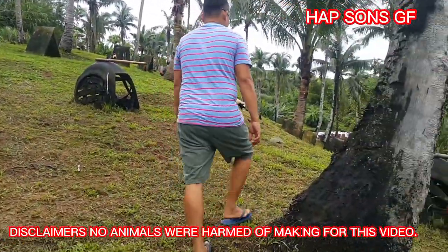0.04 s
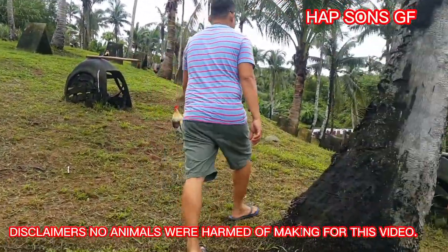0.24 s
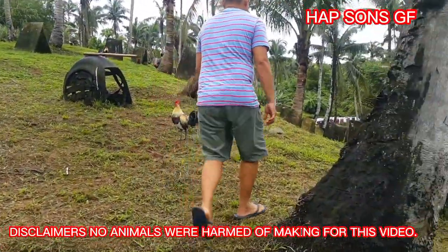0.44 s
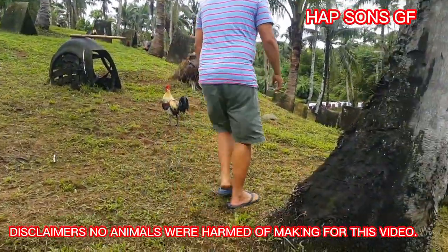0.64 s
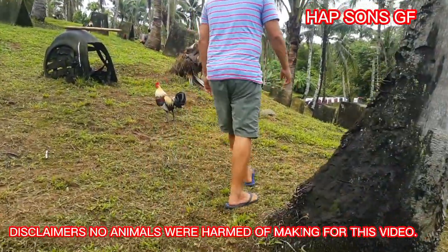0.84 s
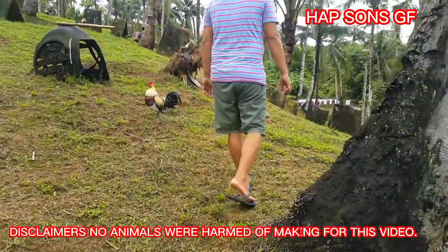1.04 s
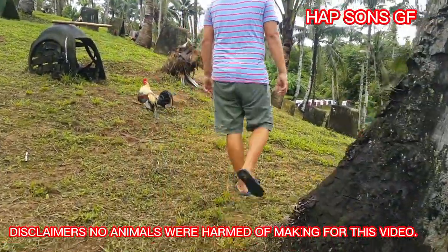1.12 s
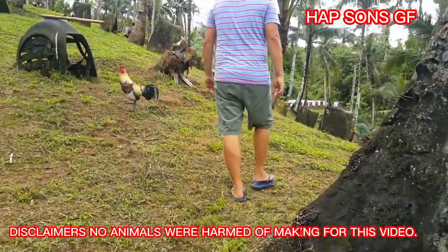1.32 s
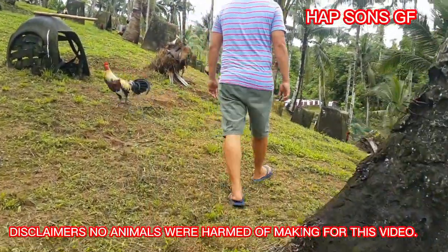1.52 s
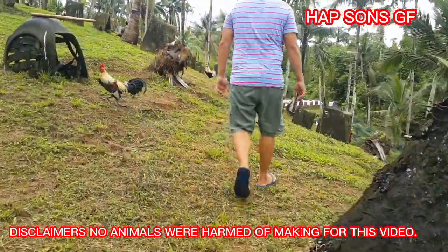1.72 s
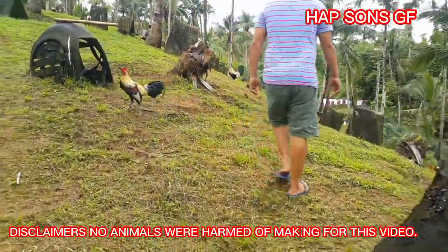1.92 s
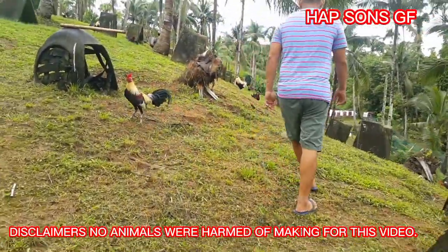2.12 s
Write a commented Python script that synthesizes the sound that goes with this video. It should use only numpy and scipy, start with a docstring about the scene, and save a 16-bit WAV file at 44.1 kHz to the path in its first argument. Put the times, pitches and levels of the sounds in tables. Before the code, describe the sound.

A faint distant rooster call and a brief thin insect tone open over soft outdoor air. From 0.2 to 1.7 seconds a near rooster crows loudly on the left, breaking between clear high notes and rough rasp, its last note long, with short diffuse reflections. A low bird note enters around 1.4 and continues; crunchy grass steps fall near 1.7 and 2.0-2.1, with faint far calls from 1.9.

```python
"""Rooster on a grassy slope

A rooster crows close by on the left: harmonic partials, broken by a rasp of flutter-modulated pulses.
Far calls and a low bird note are short partial series; steps in the grass are bursts of random cracks.
An insect sings briefly at the start as narrow-band noise, over air of coloured wide-band noise.
Two spaced microphones hear the birds and steps with time differences; the near crow also scatters.
"""
import sys
import numpy as np
from scipy import signal
from scipy.fft import rfft, irfft, next_fast_len
from scipy.io import wavfile
from scipy.ndimage import map_coordinates

SR = 44100
rng = np.random.default_rng(int(sys.argv[2]) if len(sys.argv) > 2 else 0)


def int16_out(signal):
    """Quantize to a 16-bit WAV file."""
    q = np.round(np.clip(np.atleast_2d(signal).T, -1, 1) * 32767)
    wavfile.write(sys.argv[1], SR, q.astype(np.int16))


N = 94815
CUTOFF_HZ = 15450  # upper limit of the crow's clear partials and of the microphones


def amp(db):
    """Level law: 20 dB is a factor of ten in amplitude."""
    return 10 ** (np.asarray(db) / 20)


def rms_one(x):
    """Normalization to unit root-mean-square amplitude."""
    return x / np.sqrt(np.mean(x ** 2) + 1e-20)


def in_time(rows):
    """Linear interpolation over time: a gate open from first to last row, then the columns."""
    s, *columns = np.transpose(rows)
    t = np.arange(N) / SR
    gate = np.clip(np.minimum(t - s[0], s[-1] - t) * 200, 0, 1)  # 5 ms ramps
    return [gate] + [np.interp(t, s, c) for c in columns]


def at_hz(points, hz):
    """Spectral interpolation, linear in the logarithm of frequency."""
    point_hz, values = np.array(points).T
    return np.interp(np.log(np.maximum(hz, 1)), np.log(point_hz), values)


def coloured(x, points):
    """Linear filtering: the spectrum is multiplied by a gain table of (frequency [Hz], gain [dB])."""
    size = next_fast_len(N + 4096)
    hz = np.arange(size // 2 + 1) * SR / size
    return irfft(rfft(x, size) * amp(at_hz(points, hz)), size)[..., :N]


def slow(hz):
    """Random modulation: low-passed noise of unit rms."""
    low_pass = signal.butter(2, hz, fs=SR, output="sos")
    noise = rng.standard_normal(N + 4000)
    return rms_one(signal.sosfilt(low_pass, noise)[4000:])  # without the filter's onset


def placed(x, lag_ms):
    """Interaural-type time difference: left and right copies; a positive lag delays the right one."""
    n = np.arange(N)
    return np.array([map_coordinates(x, [n + side * lag_ms * SR / 2000], order=3) for side in (1, -1)])


def air():
    """Partial coherence: stereo noise alike in the bass and extreme treble, unrelated near 940 Hz."""
    # spectrum of the air: (frequency [Hz], relative density [dB per Hz])
    air_spectrum = [(60, -3.5), (128, -4.5), (300, -15), (800, -1.5), (2000, -8), (6000, -25),
                    (15200, -38.5)]
    # left-right coherence: (frequency [Hz], likeness [-1 to 1])
    likeness = [(60, 1), (940, 0), (14800, 1)]
    level_db = -49.5
    hz = np.arange(N // 2 + 1) * SR / N
    alike = np.clip(at_hz(likeness, hz), -1, 1)
    mid, side = rfft(rng.standard_normal((2, N))) * amp(at_hz(air_spectrum, hz))
    spectra = mid * np.sqrt(1 + alike) + side * np.sqrt(1 - alike) * [[1], [-1]]
    return amp(level_db) * rms_one(irfft(spectra, N))


def insect():
    """Resonance: noise through a narrow band, independent in the two channels."""
    centre_hz, width_hz, level_db, end_s = 5370, 91, -64, 0.2
    edges_hz = [centre_hz - width_hz / 2, centre_hz + width_hz / 2]
    band = signal.butter(2, edges_hz, "band", fs=SR, output="sos")
    song = rms_one(signal.sosfilt(band, rng.standard_normal((2, N))))
    return amp(level_db) * (np.arange(N) < end_s * SR) * song


def steps():
    """Granular impact noise: each step is a burst of small random cracks in the grass."""
    # steps: (start [s], length [s], level [dB])
    step_times = [(1.659, 0.071, -29.5), (1.87, 0.012, -39.5), (2.011, 0.0566, -32), (2.122, 0.041, -29)]
    # colour of the grass: (frequency [Hz], relative density [dB per Hz])
    grass = [(300, -31), (550, -13.5), (1400, -13), (2400, -18.5), (3000, -34.5), (4500, -30), (5800, -62)]
    cracks_per_s, rustle, attack_s, release_s = 7000, 0.18, 0.0093, 0.0042
    t = np.arange(N) / SR
    cracks = (rng.random(N) < cracks_per_s / SR) * rng.standard_normal(N)
    cracks = cracks + rustle * rng.standard_normal(N)
    shape = np.zeros(N)
    for start, length, db in step_times:
        rise = np.clip((t - start) / attack_s, 0, 1)
        fall = np.clip((start + length - t) / release_s, 0, 1)
        shape += amp(db) * rise * fall
    return shape * rms_one(coloured(cracks, grass))


def far_call(rows, partials_db, rough):
    """Harmonic series: a few partials with random phase and amplitude modulation."""
    gate, hz, db = in_time(rows)
    phase = 2 * np.pi * np.cumsum(hz) / SR + rough * slow(38)
    call = np.zeros(N)
    for k, partial_db in enumerate(partials_db, 1):
        call += amp(partial_db) * (1 + rough * slow(58)) * np.sin(k * phase)
    return gate * amp(db) * call * np.sqrt(2)


def far_birds():
    """Localization by arrival time: far roosters and a low bird note, each with its own lag."""
    # calls: (time [s], pitch [Hz], level [dB])
    first_call = [(0, 791, -49), (.23, 712, -52)]
    rise_call = [(.11, 231.6, -53), (.18, 557, -42)]
    yelp_call = [(1.75, 763, -73), (1.87, 970, -47), (1.915, 1060, -49), (1.98, 840, -52.5)]
    last_call = [(2.03, 865, -52), (2.09, 950, -39), (2.15, 919, -42)]
    low_note = [(1.43, 516, -34.5), (1.6, 507.5, -33), (1.68, 451, -41), (1.75, 427, -40),
                (1.915, 435.7, -38), (1.93, 442, -42), (1.95, 472, -33.5), (2.056, 426.3, -39),
                (2.12, 407, -38)]
    # partials from the first up: relative level [dB]
    far_partials = [1.5, 2]
    low_partials = [-4.5]
    rough = 0.43
    far = placed(far_call(first_call, far_partials, rough), 0.25)
    yelp = far_call(yelp_call, far_partials, 2 * rough)
    far += placed(yelp + far_call(rise_call, low_partials, rough), 0.15)
    far += placed(far_call(last_call, far_partials, rough), -0.21)
    return far + placed(far_call(low_note, low_partials, 0.37), -0.24)


def upper_voice(phase, hz, second_db, upper_db, rasping):
    """Source and filter: harmonics from the second up, the higher ones coloured by the throat."""
    # throat, partials 3 up: (frequency [Hz], gain [dB])
    throat_gain = [(2800, -1), (3400, 4.5), (4500, -6.5), (5990, 7), (8000, -17.5), (15000, -25)]
    low_register_hz, low_tilt_db = 764, -16  # steeper fall per octave below this pitch
    waver = 0.71  # each upper partial swells and fades on its own
    voice = amp(second_db) * np.sin(2 * phase - .3)
    tilt_db = low_tilt_db * np.clip((low_register_hz - hz) / 40, 0, 1)
    for k in range(3, 22):
        # the tilt pivots at the 8th partial
        level = amp(upper_db + at_hz(throat_gain, k * hz) + tilt_db * np.log2(k / 8))
        # the rasp takes over most of the upper partials
        level = level * (k * hz < CUTOFF_HZ) * (1 - .8 * rasping) * (1 + waver * slow(12.0))
        voice += level * np.sin(k * phase + k * k)
    return voice


def rasp(phase, hz, stretches, shapes):
    """Subharmonic modulation: voice pulses shaken at an uneven share of the pitch, steadiest near half."""
    # colour of the rasp: (frequency [Hz], relative density [dB per Hz])
    throat = [(350, -65), (520, -23), (690, -9.5), (820, -14.5), (1050, -7), (1300, -14), (1600, -5),
              (1900, -12), (2140, -13.5), (2440, -8), (2750, -30), (3500, -13.5), (3750, -44), (5000, -30),
              (5800, -40.5), (7300, -43), (9500, -50), (15300, -49.5)]
    jitter_rad, breath, rate_swing, unevenness = .06, .55, .85, .35
    bright_hz, bright_octaves = 6900, .3  # the open beak lifts this band, and the top by half as much
    shaky = phase + jitter_rad * slow(330)
    pulses = sum(np.cos(k * shaky + 0.326 * k * k) for k in range(22))
    pulses = pulses + breath * rng.standard_normal(N)
    swing = rate_swing * slow(119.6)
    uneven = 1 + unevenness * slow(90)
    out = np.zeros(N)
    for (_, _, db, bright_db, tuning, share), shape in zip(stretches, shapes):
        # the rate swings less as the share nears one half, where it locks
        flutter_hz = share * hz * (1 + swing * (.53 - share))
        flutter = uneven * np.cos(2 * np.pi * np.cumsum(flutter_hz) / SR)
        colour = []
        for f, d in throat:
            band = np.exp(-(np.log2(f / bright_hz) / bright_octaves) ** 2)
            top = .5 * (f > 2 * bright_hz - 4000)
            colour.append((f * tuning, d + bright_db * (band + top)))
        burst = rms_one(coloured(shape * flutter * pulses, colour))
        out += amp(db) * burst * np.sqrt(np.mean(shape ** 2))
    return out


def near_crow():
    """Two-register phonation: clear partials and rasp, with echo interference in the left signal."""
    # clear voice: (time [s], pitch [Hz], 1st partial [dB], 2nd partial [dB], upper partials [dB])
    crow_line = [(.214, 700, -24, -32, -60), (.225, 695.6, -11, -23, -65), (.244, 721.3, -10, -23.5, -51),
                 (.25, 895, -24, -18, -45), (.29, 958, -17, -13.5, -38), (.33, 960, -17, -13.5, -38),
                 (.378, 875, -25, -20, -60), (.384, 696.4, -23, -26, -60), (.41, 607.6, -36, -29, -70),
                 (.445, 545, -48, -34, -75), (.485, 570, -40.5, -29, -69), (.502, 718, -25, -35, -42),
                 (.508, 927, -21, -9, -36), (.54, 998, -13.5, -12, -35), (.575, 971.7, -14, -11, -40),
                 (.595, 835, -29, -26, -50), (.6, 560, -45, -28, -70), (.64, 590, -30, -27, -60),
                 (.668, 704.8, -15, -17.5, -62), (.682, 872.8, -24, -13.5, -32),
                 (.77, 973, -16, -13.5, -22), (.835, 920, -17.5, -14, -40), (.9, 940, -15, -11, -42),
                 (.99, 916, -14, -8, -46), (1.07, 875, -19, -16, -40), (1.1, 687, -28, -26, -81),
                 (1.14, 622.8, -26.5, -26, -60), (1.17, 650.3, -21, -20, -50), (1.208, 700, -16, -13, -50),
                 (1.216, 871, -14.5, -24.5, -50), (1.245, 890.4, -18.5, -10, -50.5),
                 (1.29, 934.3, -19, -15.5, -40), (1.5, 883.7, -18, -18, -36), (1.57, 843, -24, -10, -42),
                 (1.65, 820, -15, -13, -46), (1.695, 780, -11, -23, -42), (1.712, 735, -6, -40, -65),
                 (1.73, 630, -30, -40.5, -72)]
    # rasps: (start [s], end [s], level [dB], bright band [dB], throat tuning [ratio], flutter [share of pitch])
    stretches = [(0.221, 0.291, -14.5, 11, 1.075, 0.28), (0.309, 0.347, -19.5, 24, 1.08, 0.4),
                 (0.332, 0.398, -14.5, 6, 1.01, 0.27), (0.379, 0.495, -34.5, 5, 0.99, .2),
                 (0.49, 0.516, -15.5, -7.5, 1.035, 0.25), (0.576, 0.598, -12.5, -18, 1.09, 0.15),
                 (0.642, 0.845, -18, -2, 1.044, 0.36), (0.859, 0.88, -13.5, 0, 1.1, 0.34),
                 (1.041, 1.145, -15.5, -3.5, 1.087, 0.27), (1.201, 1.229, -20, 9, 0.93, 0.27),
                 (1.267, 1.345, -17.5, 15.5, 0.94, .33), (1.354, 1.515, -20.5, 20, 0.945, 0.28),
                 (1.509, 1.548, -21.5, 17, 0.96, .5), (1.706, 1.73, -24.5, 3, 0.96, 0.37)]
    # an echo lifts, then cancels, the left 1st partial: (time [s], gain [dB], phase [rad])
    left_echo = [(.24, -3, 0.5), (.29, 2.5, 0.5), (.58, 4.5, 0), (.66, 1, 0), (1.5, -1.5, -0.5),
                 (1.55, 3.5, 3), (1.655, -12.5, 1.5), (1.665, -21, -1.2), (1.74, 9.5, 0.33)]
    attack_s, release_s, locked_release_s = 0.016, 0.023, 0.12  # a flutter locked at one half dies slowly
    tone_waver = 0.26  # phase [rad] and share of amplitude, while the voice rasps
    gate, hz, first_db, second_db, upper_db = in_time(crow_line)
    t = np.arange(N) / SR
    shapes = []
    for start, end, _, _, _, share in stretches:
        fall_s = release_s if share < .45 else locked_release_s
        # half open at the start and end times
        shapes.append(np.clip(np.minimum((t - start) / attack_s, (end - t) / fall_s) + .5, 0, 1))
    rasping = np.minimum(sum(shapes), 1)
    phase = 2 * np.pi * np.cumsum(hz) / SR + tone_waver * rasping * slow(72.0)
    gate = gate * (1 + tone_waver * rasping * slow(104))
    first = gate * np.sqrt(2) * amp(first_db) * np.exp(1j * phase)
    rest = gate * np.sqrt(2) * upper_voice(phase, hz, second_db, upper_db, rasping)
    rest += rasp(phase, hz, stretches, shapes)
    _, left_db, left_rad = in_time(left_echo)
    left_first = first * amp(left_db) * np.exp(1j * left_rad)
    return rest + left_first.imag, rest + first.imag


def scattered(crow):
    """Diffuse reflection: trunks and slope return the crow as exponentially decaying noise."""
    level_db, t60_s = -19.5, 0.35
    decay = amp(-60 * np.arange(SR // 2) / SR / t60_s)
    tail = rng.standard_normal((2, SR // 2)) * decay
    return amp(level_db) * signal.fftconvolve(crow[None], tail / np.linalg.norm(tail[0]), axes=1)[:, :N]


def near_rooster():
    """Arrival time and shadowing: the right microphone hears the crow later and duller."""
    # delay of the right microphone: (time [s], lag [ms])
    crow_lag = [(.2, 0.28), (1.75, 0.52)]
    # shading of the right side: (frequency [Hz], loss [dB])
    shadow = [(540, 0.5), (1630, 7.5), (4920, 12), (8000, 25.5), (14800, 8)]
    toward_left, crow = near_crow()
    lag_ms = in_time(crow_lag)[1]
    left = placed(toward_left, lag_ms)[0]
    right = placed(crow, lag_ms)[1]
    direct = np.array([left, coloured(right, [(hz, -db) for hz, db in shadow])])
    return direct + scattered(crow)


def scene():
    """Superposition: the pressures of all sources add."""
    background = air() + insect()
    return background + placed(steps(), -0.26) + far_birds() + near_rooster()


def record(dry):
    """Band limitation: the deep bass and the top are cut."""
    high_pass = signal.butter(2, 90, "high", fs=SR, output="sos")
    low_pass = signal.cheby2(16, 70, CUTOFF_HZ, fs=SR, output="sos")
    return signal.sosfilt(np.vstack([high_pass, low_pass]), dry)


dry = scene()
out = record(dry)
int16_out(out)
```